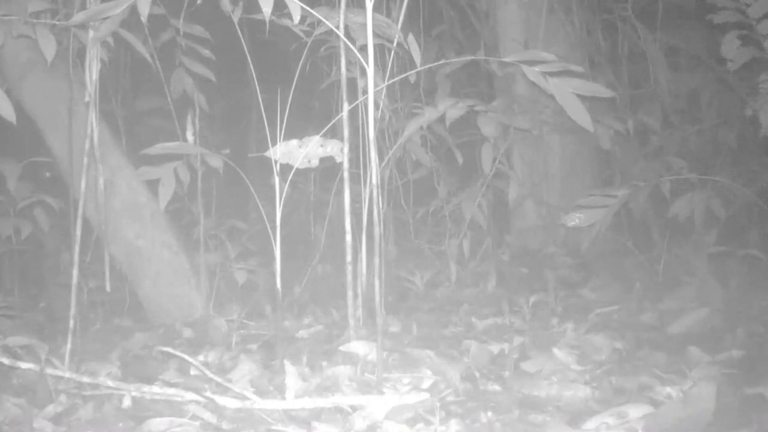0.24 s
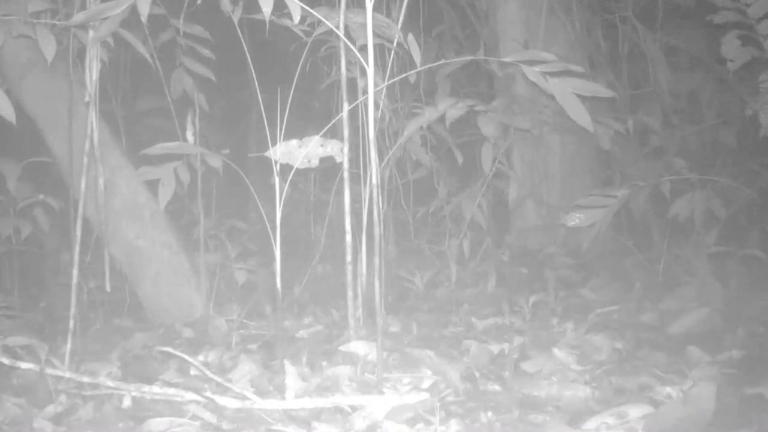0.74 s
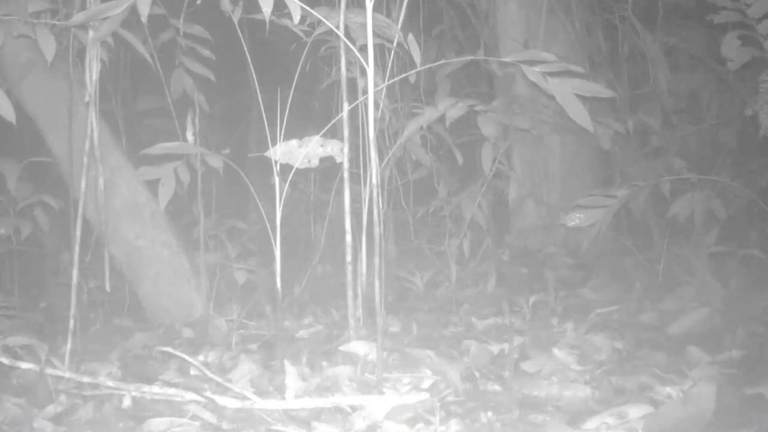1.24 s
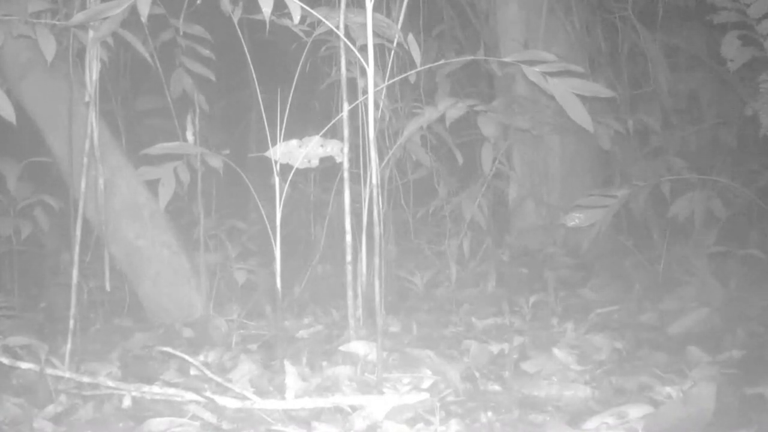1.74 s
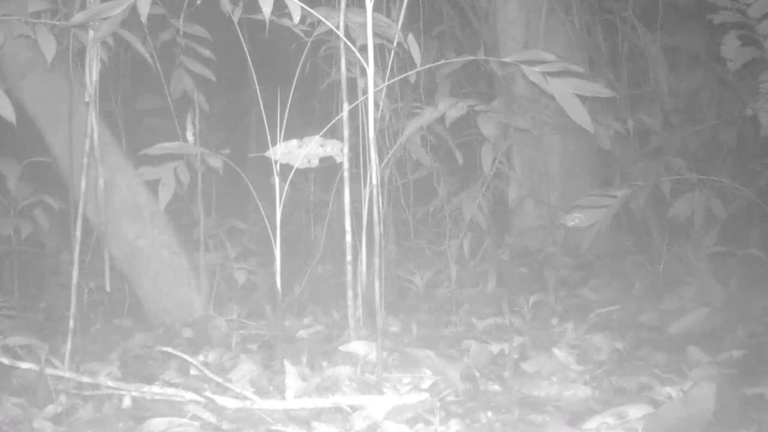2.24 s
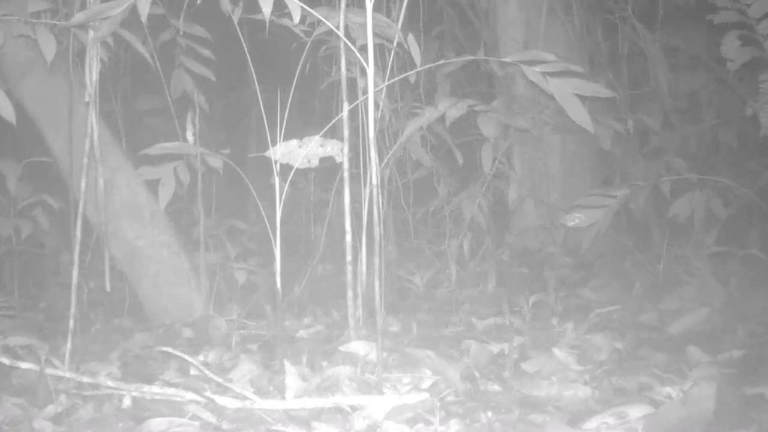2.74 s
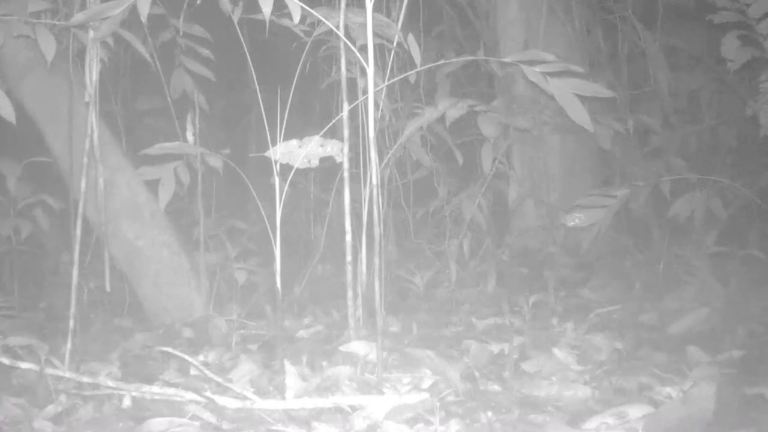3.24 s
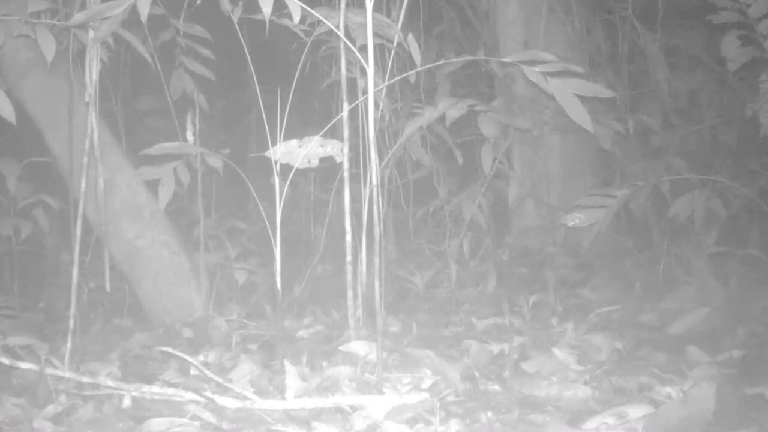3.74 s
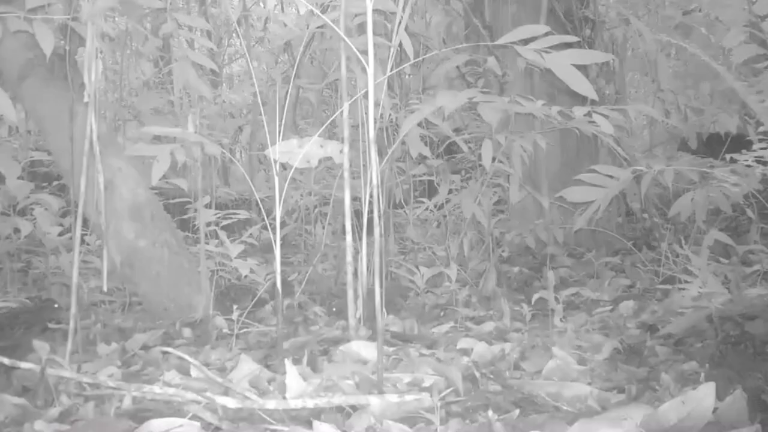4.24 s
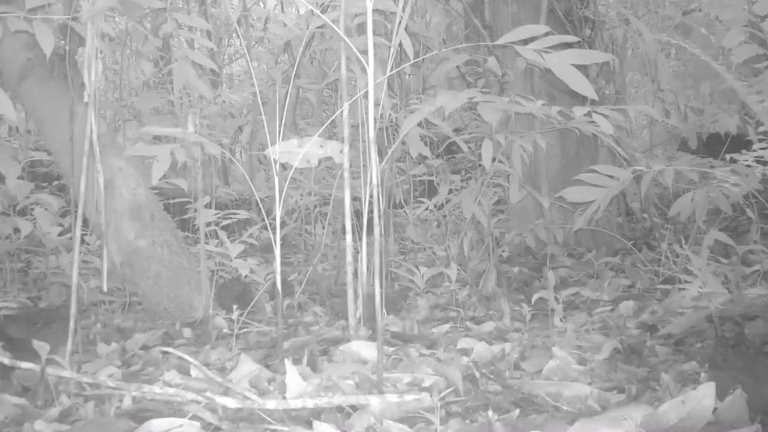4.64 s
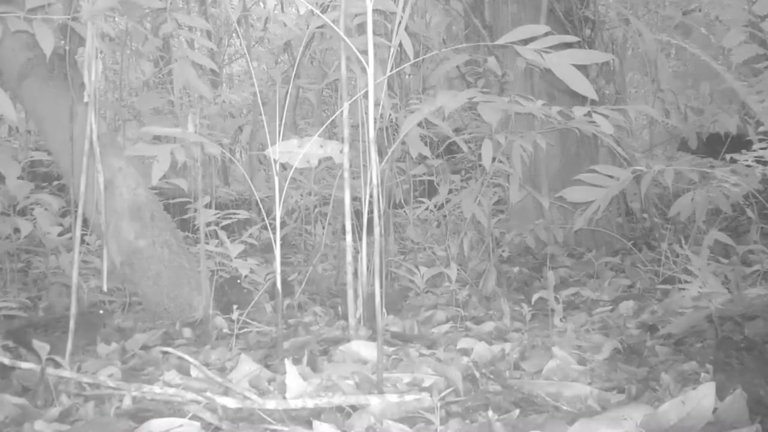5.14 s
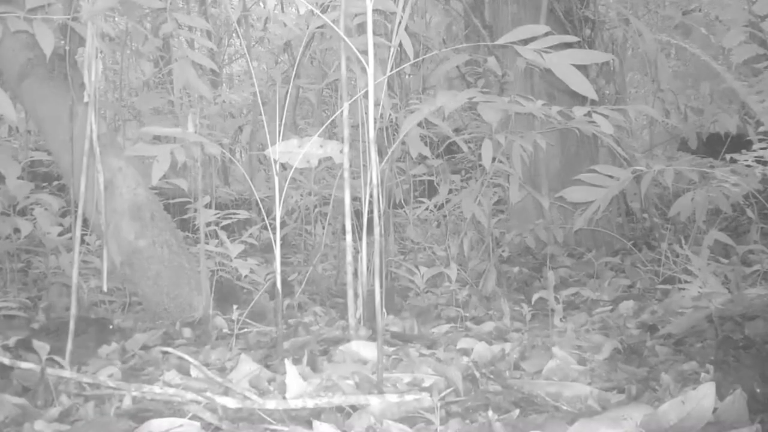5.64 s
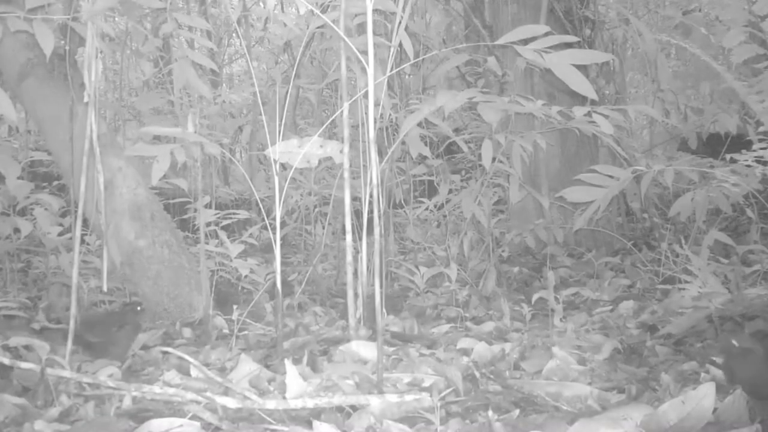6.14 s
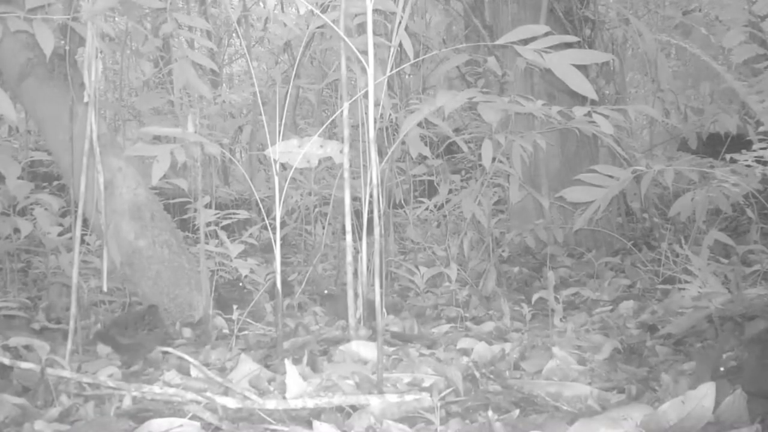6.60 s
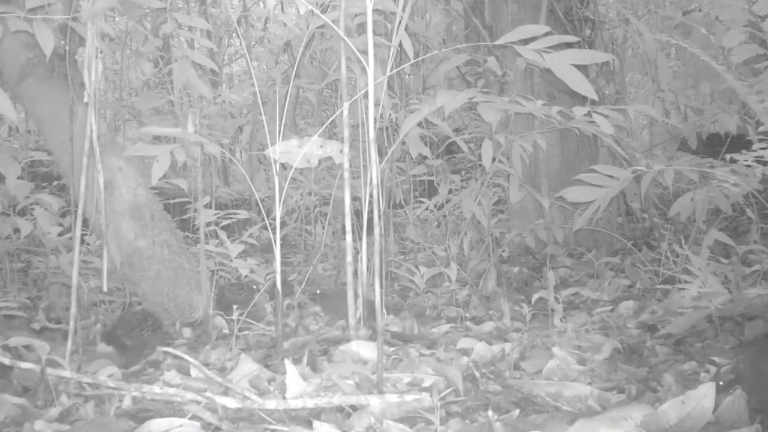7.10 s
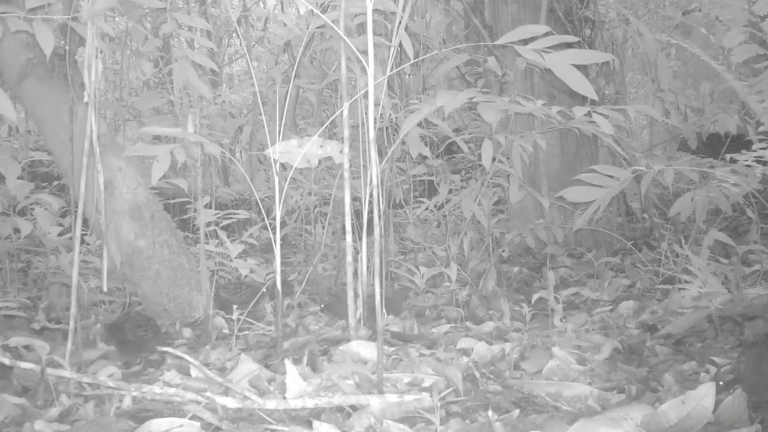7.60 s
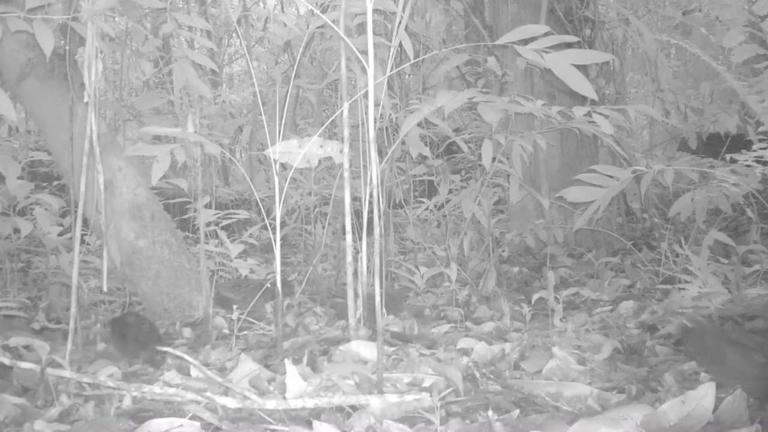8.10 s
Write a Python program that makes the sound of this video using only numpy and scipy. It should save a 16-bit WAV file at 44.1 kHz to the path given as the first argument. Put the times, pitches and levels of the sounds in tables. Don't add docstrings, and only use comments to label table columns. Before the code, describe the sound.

Hundreds of crickets ring in a steady, shrill wall around 4 kHz in a wet night forest, with faint raspy katydid swells and sparse water drops cracking on leaves, the last loud and close. At about four seconds it all cuts to a short silence. Then a quieter dawn: thin bird whistles echoing among trunks, dry litter rustling, leaf snaps, faint cricket chirps. A cheap fixed microphone hisses and thumps in rapid low pulses.

```python
import sys
import numpy as np
from scipy import signal
from scipy.fft import rfft, irfft
from scipy.io import wavfile
from scipy.ndimage import uniform_filter1d

SR = 44100
rng = np.random.default_rng(int(sys.argv[2]) if len(sys.argv) > 2 else 0)


def how_loud(loudness_db):
    steps = np.asarray(loudness_db, float) / 20
    return 10 ** steps


def dump_mix(stems):
    frames = np.atleast_2d(stems).T
    limited = np.clip(frames, -1, 1)
    pcm = np.round(limited * 32767).astype(np.int16)
    wavfile.write(sys.argv[1], SR, pcm)


N = 368665
T = np.arange(N) / SR
NIGHT_END_S, DAWN_START_S = 3.9523, 4.1597


def level(x, db):
    return x * how_loud(db) / np.sqrt(np.mean(x ** 2) + 1e-30)


def band(x, lo_hz, hi_hz):
    return signal.sosfilt(signal.butter(2, [lo_hz, hi_hz], "band", fs=SR, output="sos"), x)


def walk(rate, size):
    knots = rng.standard_normal(2000)
    return np.interp(np.arange(size) * rate / SR, np.arange(2000), knots)


def bumps(rows, width_s):
    return np.sqrt(sum(how_loud(2 * db) * np.exp(-((T - s) / width_s) ** 2) for s, db in rows))


def forest(x, t60_s, wet_db, hop=8192):
    t = T[:int(0.8 * SR)]
    fade = np.exp(-np.log(1000) * t / t60_s) * (1 - np.exp(-t / 0.002))
    wet = np.zeros(len(x) + 2 * hop + len(t))
    for at in range(-hop, len(x), hop):
        tail = rng.standard_normal(len(t)) * fade / np.sqrt(np.sum(fade ** 2))
        start = max(at, 0)
        piece = x[start:at + 2 * hop]
        piece = piece * np.sin(np.pi / 2 * (np.arange(len(piece)) + max(-at, 0)) / hop)
        if piece.any():
            wet[start:][:len(piece) + len(t) - 1] += signal.fftconvolve(piece, tail)
    return x + how_loud(wet_db) * wet[:len(x)]


def cricket(hz, rate, share, wander_hz, size):
    tone = np.sin(2 * np.pi * np.cumsum(hz + wander_hz * walk(40, size)) / SR)
    stroke = (np.cumsum(rate * (1 + 0.01 * walk(2.8, size))) / SR + rng.random()) % 1
    pulses = np.sin(np.pi * np.minimum(stroke / np.clip(share, 0.1, 1), 1))
    return tone * pulses * how_loud(2.7 * walk(9, size))


def katydids(size):
    first_s, every_s, half_width_s, bout_db = 1.02, 1.14, 0.25, -63
    middles = [(first_s + k * every_s, bout_db) for k in (-1, 0, 1, 2)]
    bouts = bumps(middles, half_width_s)[:size]
    teeth = rng.standard_normal(size) * (0.3 + np.sin(np.pi * 130 * T[:size]) ** 2)
    return level(band(teeth, 10200, 13800), 1.5) * bouts


def chorus(count=5):
    # middle_hz, spread_hz, pulses_per_s, sounding_share, wander_hz, level_db
    crowds = [(4310, 97, 70, 0.59, 29.9, -34), (4474, 130, 150, 0.6, 30, -28.5),
              (4720, 74, 160, .45, 50, -42.5), (3679, 110, 40, 0.47, 33, -42.5),
              (3920, 70, 34, 0.65, 37, -44), (2810, 50, 40, 0.62, 27, -61.5),
              (5902, 100, 74, 0.41, 23.5, -44), (2942, 24, 17, 0.33, 18, -52.5),
              (2573, 70, 30, 0.42, 44, -57), (3230, 130, 50, 0.37, 37, -53.5),
              (5010, 150, 140, 0.11, 60, -50.5), (8650, 400, 170, 0.45, 130, -64)]
    # pitch_hz, pulses_per_s, sounding_share, wander_hz, level_db
    solos = [
        (4602, 197, .97, 3, -39),
        (4405, 197, .97, 4, -43),
        (5918, 65, .26, 3, -51),
        (3166, 110, .6, 2, -61),
    ]
    size = int(NIGHT_END_S * SR) + 1
    far = 0
    for hz, spread_hz, rate, share, wander_hz, db in crowds:
        crowd = 0
        for seat in np.linspace(-1.3, 1.3, count):
            singer = cricket(hz + spread_hz * seat, rate * (1 + 0.12 * seat), share, wander_hz, size)
            crowd = crowd + np.exp(-0.4 * seat * seat) * singer
        far = far + level(crowd, db)
    near = sum(level(cricket(*singer, size), db) for *singer, db in solos)
    swell_db = -0.2 * (T[:size] - 2) + 0.5 * walk(9, size)
    song = forest(far, 1.0, 6.55) * how_loud(-7.5 + swell_db) + near
    return np.pad(song + katydids(size), (0, N - size))


def preamp():
    # pitch_hz, density_db (per Hz)
    hiss_curve = [(15, -2.5), (40, 2.5), (100, -3), (250, -6.5), (600, -14), (1400, -23.5), (4000, -31.5),
                  (15000, -40)]
    # from_s, start_ms (in the write cycle), length_ms
    writes = [
        (0, 6, 5.9),
        (4.1, 32, 4.1),
        (4.5, 38, 4.2),
        (5.25, 31, 5.4),
        (7.45, 32, 8),
        (7.8, 38.6, 7.6),
    ]
    write_hz, write_db, hiss_db = 22.245, -26.5, -36.5
    hz, db = np.transpose(hiss_curve)
    bins = np.maximum(np.arange(N // 2 + 1) * SR / N, 1)
    hiss = irfft(rfft(rng.standard_normal(N)) * how_loud(np.interp(np.log(bins), np.log(hz), db)), N)

    from_s, start_ms, length_ms = np.transpose(writes)
    cycles = np.arange(int(N / SR * write_hz)) / write_hz
    chance = rng.standard_normal((len(cycles), 3)).T
    slot = np.searchsorted(from_s, cycles, "right") - 1
    on = cycles + (start_ms[slot] + 0.36 * chance[0]) / 1000
    off = on + length_ms[slot] * np.exp(0.2 * chance[1]) / 1000
    size = how_loud(write_db + 1.66 * chance[2])
    steps = np.zeros(N + SR)
    np.add.at(steps, (on * SR).astype(int), -size)
    np.add.at(steps, (off * SR).astype(int), size)
    sag = signal.lfilter(*signal.butter(1, [30, 250], "band", fs=SR), np.cumsum(steps)[:N])
    return level(hiss, hiss_db) + sag


def drips():
    # start_s, peak_db, ring_hz
    drops = [
        (0.9901, -27.5, 1161),
        (1.3598, -27, 2120),
        (1.3657, -26, 2110),
        (1.3774, -36, 2560),
        (2.0166, -29, 886),
        (2.4915, -25.5, 2140),
        (3.0609, -28, 2353),
        (3.6504, -12.5, 1710),
    ]
    out, t = np.zeros(N), T[:1500]
    ring_shape = np.exp(-t / 0.0012) * (1 - np.exp(-t / 0.00035))
    for s, db, own_hz in drops:
        crack = band(band(rng.standard_normal(len(t)), 400, 6500), 400, 5000) * np.exp(-t / 0.0016)
        ring = 0
        for hz, size in ((own_hz, 0.93), (740, 0.65), (1110, 0.55), (4150, 1.6), (6200, 0.5)):
            ring = ring + size * np.sin(2 * np.pi * hz * t)
        out[int(s * SR):][:len(t)] += how_loud(db) * (0.81 * crack - ring * ring_shape)
    return forest(out, 0.099, -12.5)


def litter():
    # middle_s, level_db
    shuffles = [(4.2, -63), (4.82, -59), (5.57, -62), (5.95, -55.5), (6.25, -59), (6.62, -60),
                (6.82, -54.5), (7.25, -60), (7.58, -61), (8.13, -68), (8.33, -70)]
    # middle_s, level_db
    chirps = [
        (4.58, -64),
        (5.22, -65),
        (5.57, -61),
        (5.92, -63),
        (6.07, -63),
        (6.44, -67),
        (7.05, -62),
        (7.6, -64),
        (7.96, -65),
    ]
    sizes = how_loud(2.4 * np.minimum(rng.exponential(size=N), 4))
    grains = rng.standard_normal(N) * (rng.random(N) < 1500 / SR) * sizes
    crackle = level(forest(band(grains, 4950, 6820), 0.053, 0.5), 0)
    rustle = crackle * (bumps(shuffles, 0.099) + how_loud(-71))
    singer = level(forest(cricket(4005, 45, 0.97, 7.4, N), 0.12, -3.0), 0)
    late = singer * bumps(chirps, 0.045)
    return (rustle + late) * (T > DAWN_START_S)


def whistle(length_s, start_hz, settled_hz, db, flutter_hz):
    u = np.linspace(0, 1, int(length_s * SR))
    if start_hz > settled_hz:
        slide = np.exp(-u * length_s / 0.028)
    else:
        slide = np.cos(np.pi / 2 * np.minimum(u / 0.6, 1)) ** 2
    off_hz = (start_hz - settled_hz) * slide
    hz = settled_hz + off_hz + flutter_hz * walk(119.3, len(u))
    shape = np.minimum(u / 0.12, 1) ** 0.37 * np.minimum((1 - u) / 0.35, 1)
    shape = shape * how_loud(-4 * abs(off_hz) / 1000)
    shape = shape * how_loud(2.0 * walk(70, len(u)))
    return np.sqrt(2) * how_loud(db) * shape * np.sin(2 * np.pi * np.cumsum(hz) / SR)


def birds():
    # start_s, length_s, start_hz, settled_hz, level_db
    song = [
        (4.294, 0.18, 6960, 5625, -41.5),
        (4.56, 0.18, 7840, 7600, -44),
        (4.759, 0.13, 6160, 6456, -38.5),
        (5.05, 0.1, 6750, 7500, -40.5),
        (5.12, 0.16, 7500, 7365, -34.5),
        (5.355, .12, 5600, 5790, -45.5),
        (5.454, 0.18, 7600, 7830, -43.5),
        (5.649, .2, 6210, 6580, -38),
        (5.978, .19, 7170, 7485, -39.5),
        (6.234, 0.14, 5630, 5555, -42.5),
    ]
    # start_s, length_s, start_hz, settled_hz, level_db
    far_song = [(4.31, 0.18, 7200, 6040, -47), (4.545, .04, 8530, 7900, -54),
                (4.908, 0.073, 8440, 8300, -53), (5.19, .08, 10180, 10050, -60),
                (5.307, 0.091, 9800, 9600, -61), (5.378, .08, 6000, 6350, -48), (5.37, .1, 8400, 8650, -53),
                (5.47, 0.13, 8500, 9030, -57), (5.63, 0.13, 8570, 8760, -51), (5.748, .26, 8550, 8350, -56),
                (5.888, 0.12, 5530, 5400, -61), (6.043, 0.18, 7950, 7820, -55),
                (6.266, .063, 5870, 6000, -51), (7.237, .32, 6500, 6800, -62)]
    # start_s, length_s, level_db
    coo_rows = [
        (7.551, 0.099, -54),
        (7.798, 0.19, -57),
        (7.992, .22, -64),
        (8.266, 0.074, -53.5),
    ]
    coos = [(s, length_s, 2890, 3060, db) for s, length_s, db in coo_rows]
    out = np.zeros(N + SR)
    for rows, flutter_hz in ((song, 42), (far_song, 120), (coos, 45)):
        for s, *note in rows:
            tone = whistle(*note, flutter_hz)
            out[int(s * SR):][:len(tone)] += tone
    return forest(out[:N], 0.8, 5.0) * how_loud(-6.0)


def snaps():
    # start_s, peak_db
    breaks = [
        (6.6792, -37),
        (6.7441, -41),
        (6.9456, -38),
        (7.0494, -44),
        (7.165, -38),
        (7.373, -39),
        (7.634, -51),
        (8.1369, -44),
        (8.31, -43),
    ]
    out, t = np.zeros(N), T[:600]
    for s, db in breaks:
        out[int(s * SR):][:len(t)] += how_loud(db + 2.5) * rng.standard_normal(len(t)) * np.exp(-t / 0.005)
    return forest(band(band(out, 4600, 7200), 4600, 7200), 0.1, -3.0)


def scene():
    return (chorus() + drips() + litter() + birds() + snaps())[None]


def masking(x, size=16, count=64):
    lines = signal.stft(x, window="cosine", nperseg=2 * size * count)[2]
    power = np.abs(lines[:-1].reshape(count, size, -1)) ** 2
    mean = uniform_filter1d(power.mean(1), size=2)
    patch = uniform_filter1d(uniform_filter1d(power, size=4, axis=1), size=2)
    above = np.arange(count)[:, None] - np.arange(count)
    spread = np.where(above > 0, how_loud(2 * (-28.3 - 1.9 * above)), 0)
    budget = how_loud(2 * 2.2 * walk(13, N)[::size * count])
    hidden = mean < spread[:, 2:] @ mean[2:] * np.resize(budget, mean.shape[1])
    busy = mean[8:].sum(0) > how_loud(2 * -42.0)
    weak = patch < how_loud(2 * np.where(busy, -0.9, -2.1)) * np.median(patch, axis=1, keepdims=True)
    weak[:24] = False
    keep = ~hidden[:, None] & ~weak
    keep[:18] = True
    lines[:-1] *= keep.reshape(size * count, -1)
    return signal.istft(lines, window="cosine", nperseg=2 * size * count)[1][:N]


def roll_off(x):
    return signal.sosfilt(signal.butter(12, 14490, fs=SR, output="sos"), x)


def record(dry):
    awake = (T < NIGHT_END_S) | (T > DAWN_START_S)
    charge = -how_loud(-24.0) * np.exp(-np.maximum(T - DAWN_START_S, 0) / 0.14) * (T > DAWN_START_S)
    spectrum = rfft((masking(dry[0] + preamp()) + charge) * awake)
    below_top = np.arange(len(spectrum)) * SR / N < 13960
    mix = irfft(spectrum * below_top, N) * awake
    return roll_off(mix[None])


dry = scene()
out = record(dry)
dump_mix(out)
```